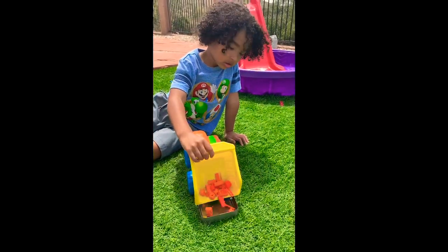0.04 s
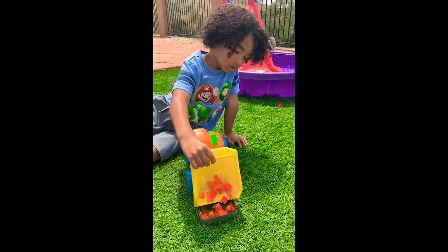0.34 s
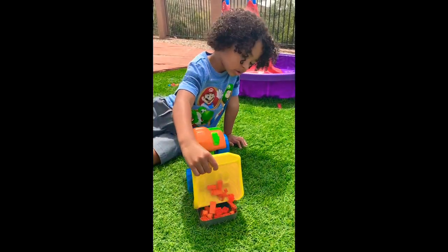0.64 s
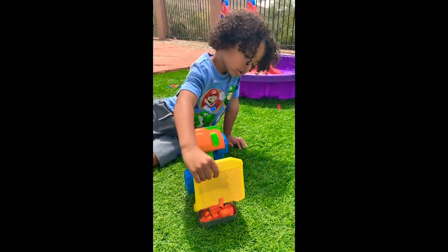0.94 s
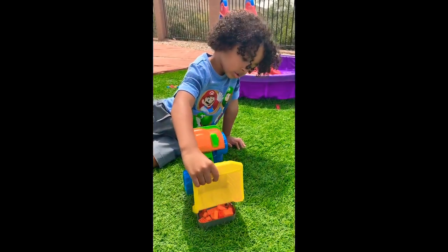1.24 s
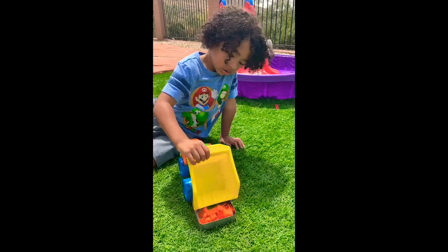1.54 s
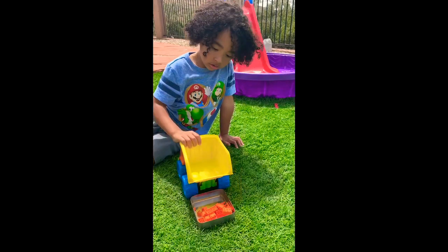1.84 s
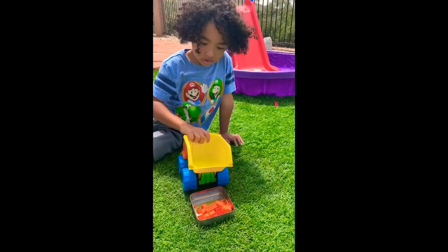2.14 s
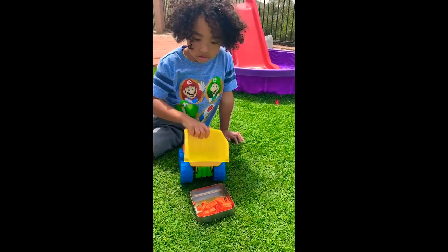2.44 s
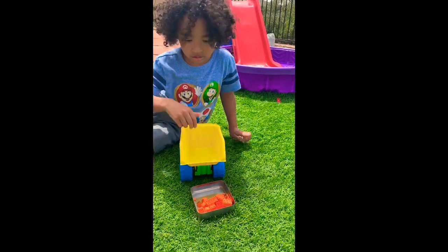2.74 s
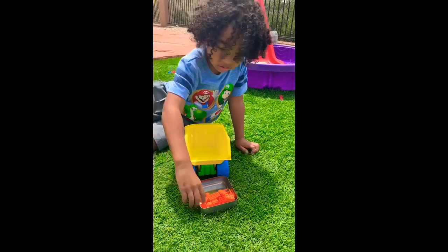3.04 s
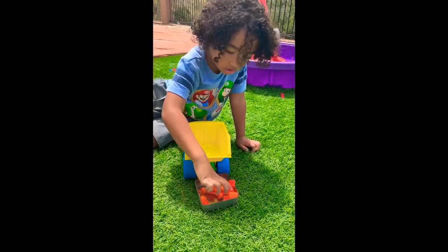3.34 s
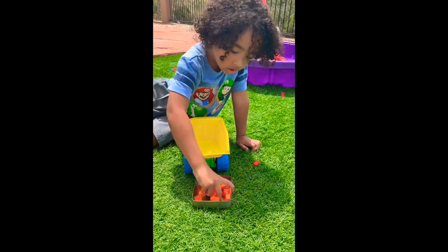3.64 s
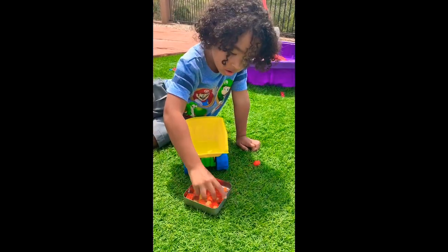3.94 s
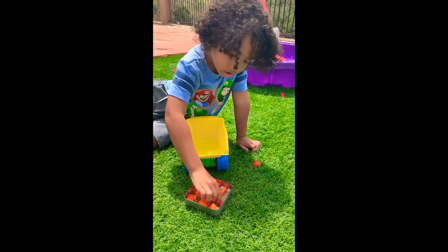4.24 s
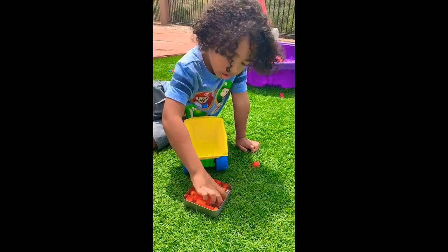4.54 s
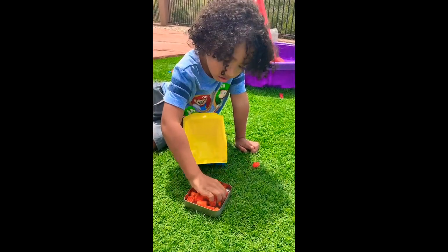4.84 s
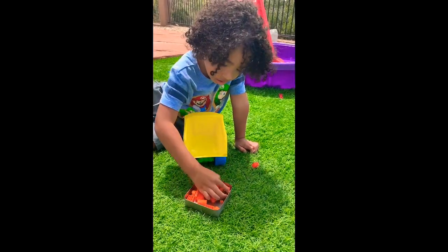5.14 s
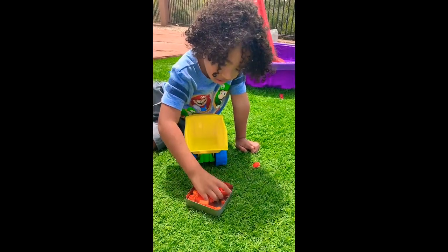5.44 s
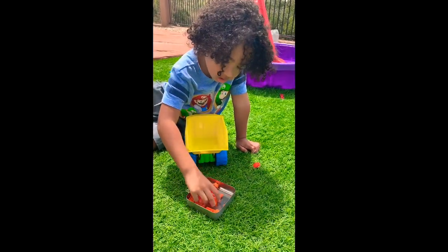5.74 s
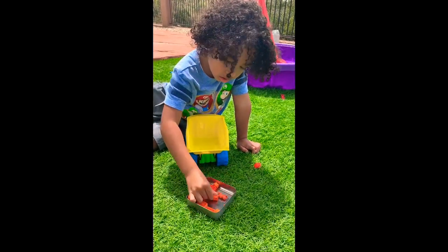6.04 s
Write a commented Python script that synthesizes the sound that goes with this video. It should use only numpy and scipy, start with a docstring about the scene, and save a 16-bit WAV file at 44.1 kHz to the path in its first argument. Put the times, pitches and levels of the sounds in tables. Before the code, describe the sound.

Small hard pieces tumble from a plastic toy dump truck into a shallow metal tin with a bright, clinking rattle. The hollow truck knocks as it is tipped back and moved, with a faint brush of cloth and grass. Then fingers stir the pieces around the tin in uneven bursts. Wind rumbles on the close phone microphone over a quiet garden.

```python
"""Small hard pieces rattle out of a plastic toy dump truck into a shallow metal tin on a lawn.
Each hit is a short crack that sets the tin ringing. The hollow truck knocks as it is tipped back
and moved, cloth and grass rustle, then fingers stir the pieces round the tin. All the while,
wind buffets the two microphone openings (ports) of a phone held close by, over a quiet garden."""
import sys
import numpy as np
from scipy import signal
from scipy.fft import rfft, irfft, next_fast_len
from scipy.io import wavfile
from scipy.ndimage import uniform_filter1d

SR = 44100
rng = np.random.default_rng(int(sys.argv[2]) if len(sys.argv) > 2 else 0)


def put_to_file(sound):
    """Save the sound as 16-bit audio at rate SR, in the file named by the first command-line argument."""
    columns = np.atleast_2d(sound).T  # one column per channel
    safe = np.clip(columns, -1, 1)
    whole_steps = np.round(safe * 32767)
    wavfile.write(sys.argv[1], SR, whole_steps.astype(np.int16))


N = 272337
TIME = np.arange(N) / SR
AGE = np.arange(4096) / SR  # seconds since a hit
SPLITS_HZ = (2750, 5600)  # borders between the tin's bottom notes, its wall notes and the bright tick


def undb(db):
    """Turn decibels into a gain."""
    return 10 ** (np.asarray(db) / 20)


def unit(x):
    """Scale to an average (rms) size of 1."""
    return x / np.sqrt(np.mean(x ** 2))


def wander(per_s):
    """Drift at random, turning per_s times a second."""
    count = int(TIME[-1] * per_s) + 2
    return unit(np.interp(TIME * per_s, np.arange(count), rng.standard_normal(count)))


def colour(x, points):
    """Shape the tone along a curve of (f/Hz, level/dB) points."""
    hz, db = np.transpose(points)
    size = 2 * len(AGE)
    grid = np.maximum(np.fft.rfftfreq(size, 1 / SR), 1)
    gain = undb(np.interp(np.log(grid), np.log(hz), db))
    cepstrum = irfft(np.log(gain))
    cepstrum[1:size // 2] *= 2  # folded so the filter rings after a hit, never before
    cepstrum[size // 2 + 1:] = 0
    response = irfft(np.exp(rfft(cepstrum)))
    length = x.shape[-1]
    return irfft(rfft(x) * rfft(response, length), length)


def stereo_noise(points, side_db):
    """Shaped noise, partly different at the two ports."""
    mid, side = colour(rng.standard_normal((2, N)), points)
    return unit(mid + undb(side_db) * side * np.array([[1], [-1]]))


def even(x, size=2400):
    """Smooth out the chance swells of a noise."""
    return x / np.sqrt(uniform_filter1d(np.mean(x ** 2, axis=0), size) + 1e-9)


def fade(t60):
    """One fade-out for each t60, the seconds it takes to fall by 60 dB."""
    return np.exp(-np.log(1000) * AGE / np.maximum(np.reshape(t60, (-1, 1)), .001))


def ring(hz, t60):
    """One fading pure tone for each frequency."""
    return np.sin(2 * np.pi * np.outer(hz, AGE)) * fade(t60)


def peak_to(waves, db, size=128):
    """Bring each hit's loudest moment to the given level."""
    peak = np.sqrt(uniform_filter1d(waves ** 2, size, axis=-1).max(axis=-1))
    return waves * (undb(db) / peak)[..., None]


def weigh(waves, splits_hz, levels_db):
    """Set each band's level, low to high: these depend on where and how hard a hit lands."""
    out = 0
    for hz, db in zip(splits_hz, levels_db):
        low = signal.sosfilt(signal.butter(5, hz, "low", fs=SR, output="sos"), waves)
        waves = signal.sosfilt(signal.butter(5, hz, "high", fs=SR, output="sos"), waves)
        out = out + peak_to(low, db)
    return out + peak_to(waves, levels_db[-1])


def place(times, waves):
    """Lay the hits out in time."""
    out = np.zeros(N + len(AGE))
    for start, wave in zip(np.clip(times * SR, 0, N - 1).astype(int), waves):
        out[start:start + len(AGE)] += wave
    return out[:N]


def tin_hits(times, t60, ring_db, tail_db, attack_s, filled_s=2):
    """A piece meets the tin: a crack, the piece's own brief ring, and the tin's notes."""
    # the tin's notes: f/Hz, t60/s, relative level/dB for dropped pieces, the same for pushed ones
    tin_notes = [(335, 0.05, -18, -40.5), (506, 0.04, -27.5, -24), (741, 0.049, -12, -26.5),
                 (995, 0.029, -9, -14.5), (1233, 0.024, -10.5, -16.5), (1570, 0.046, -3.5, -8.5),
                 (1676, 0.048, 0, -5), (1790, .04, -51, -15), (2123, 0.066, -13, -12.5),
                 (2294, 0.057, -11.5, -2), (2392, 0.024, -6.5, 8), (3024, 0.17, -15, -16.5),
                 (3472, 0.071, -10, -2.5), (3634, 0.079, -7.5, -4), (4154, 0.15, -16, -7.5),
                 (4202, 0.029, 4.5, 10), (4554, 0.037, 5.5, -8.5), (4805, 0.042, -4, 2.5),
                 (5234, 0.056, 9, 5), (6560, 0.055, -1, -42), (6330, 0.048, -9.5, -5),
                 (6770, 0.07, -7, -2.5), (7550, 0.036, -2.5, -3.5), (7500, 0.03, -19, -16),
                 (8240, 0.067, -9.5, -4), (9270, 0.036, -15.5, -10), (9600, 0.052, -18.5, -10.5),
                 (10100, 0.04, -16.5, -6), (10650, 0.069, -9.5, -7), (14500, 0.035, -13, -5)]
    # tone of the dense, fine ring of pieces and tin: f/Hz, relative level/dB
    clatter_tone = [(100, -34), (300, -15), (500, -22), (750, -17.5), (1200, 1), (1800, 5.5), (2800, 2),
                    (4200, 10.5), (5700, 10), (6700, 6.5), (9000, 4.5), (12000, -5), (14000, 3.5),
                    (16000, -16)]
    count = len(times)
    hz, note_t60, drop_db, push_db = np.transpose(tin_notes)
    shape = undb(np.where(times[:, None] < filled_s, drop_db, push_db))
    # the spot that is hit decides which notes stand out
    strength = shape * rng.standard_normal((count, len(hz)))
    strength *= undb(2.5 * rng.standard_normal(strength.shape))
    tin = np.zeros((count, len(AGE)))
    for group in np.array_split(np.argsort(times), 24):
        detune = 1 + .006 * rng.standard_normal(len(hz))  # by the shifting load
        tin[group] = strength[group] @ ring(hz * detune, note_t60)
    piece = peak_to(ring(rng.uniform(6000, 11500, count), .03), -9)
    crack_fade = fade(t60) + undb(tail_db) * fade(.13)
    crack = colour(rng.standard_normal(tin.shape) * crack_fade, clatter_tone)
    onset = 1 - np.exp(-AGE / attack_s)  # waves take a moment to fill the metal
    return (peak_to(crack, 0) + peak_to(tin, ring_db) + piece) * onset


def heap(span_s, count, tick_db, wall_db, bottom_db, ring_db, spread_db, attack_s):
    """Many small, uneven collisions as the heap slides or is pushed, then settles."""
    # moves of the heap: t/s, length/s, relative level/dB, brightness/dB
    shoves = [(0.0, 0.1, -38, -5), (0.048, .25, -33, -2.5), (0.317, 0.26, -38, -0.5), (0.639, .21, -31, -2),
              (0.852, 0.098, -37.5, 1.5), (0.98, 0.36, -56, -3.5), (1.495, 0.13, -39, -1),
              (3.092, 0.12, -29.5, -0.5), (3.322, .14, -36, 0.5), (3.52, 0.095, -36, 0),
              (3.65, .09, -42.5, 0), (3.73, 0.22, -36, 0), (3.873, 0.29, -32, 1.5),
              (4.146, 0.23, -37.5, -0.5), (4.479, .15, -42, 0), (4.777, 0.067, -55.5, -5.5),
              (4.888, 0.042, -44.5, 3), (4.97, 0.094, -51.5, 2.5), (5.253, 0.21, -51.5, 0.5),
              (5.613, 0.064, -46, -3), (5.779, 0.063, -49.5, -0.5), (5.922, 0.16, -34.5, 0)]
    rise_db_per_s, settle_db_per_s = 2513, 267
    s = span_s[0] + (span_s[1] - span_s[0]) * (np.arange(count) + rng.uniform(0, 1, count)) / count
    size_db = spread_db * np.clip(rng.standard_normal(count), -2, 1.4)
    start, length, db, bright_db = np.transpose(shoves)
    since = s[:, None] - start
    motion = db - rise_db_per_s * np.maximum(-since, 0) - settle_db_per_s * np.maximum(since - length, 0)
    level = motion.max(axis=1) + size_db  # each hit follows the strongest move
    bright = bright_db[motion.argmax(axis=1)]
    levels = (level - bright + bottom_db, level + wall_db, level + bright + tick_db)
    waves = tin_hits(s, np.full(count, .018), ring_db, tail_db=-22, attack_s=attack_s)
    return place(s, weigh(waves, SPLITS_HZ, levels))


def wind(breeze_db=-43, sway_db=3, rumble_db=-1, flutter_db=-54, buffet_db=-3):
    """Slow swirls of air rumble, stronger gusts flutter higher, and a few thump the ports."""
    # gusts: peak t/s, length/s, relative level/dB
    gust_peaks = [(0.293, 0.065, -30.5), (0.394, 0.043, -30.5), (0.8, 0.053, -32), (1.2, 0.1, -35),
                  (1.444, 0.11, -30), (1.623, 0.064, -34.5), (1.777, 0.065, -29.5), (1.897, 0.033, -36.5),
                  (2.396, 0.033, -29.5), (2.663, 0.047, -34.5), (2.96, 0.044, -33.5), (3.161, 0.045, -25.5),
                  (3.328, 0.093, -21.5), (3.414, 0.035, -25), (3.521, 0.059, -29), (3.717, 0.039, -22),
                  (3.798, 0.031, -22.5), (3.874, 0.064, -30), (4.143, .05, -34.5), (4.284, 0.094, -32),
                  (4.625, 0.03, -36.5), (5.005, 0.037, -23.5), (5.126, 0.13, -26.5), (5.39, 0.1, -35),
                  (5.767, 0.11, -35), (6.06, .15, -36)]
    # sudden thumps: t/s, relative level/dB
    buffets = [(1.409, -22.5), (1.446, -25.5), (3.292, -9.5), (3.343, -12.5), (3.354, -14), (3.392, -12.5),
               (4.994, -18), (5.067, -18.5), (5.105, -15)]
    # tones of the three wind sounds: f/Hz, relative level/dB
    rumble_tone = [(12, -17), (25, 0), (48, 3), (80, 1.5), (115, -12), (170, -28), (300, -52.5),
                   (1500, -100)]
    flutter_tone = [(60, -12), (120, 5), (180, -1.5), (250, -9.5), (350, -17), (500, -33.5), (900, -44.5),
                    (3000, -83)]
    thump_tone = [(30, -4.5), (110, 5.5), (220, -2), (400, -17.5), (700, -27.5), (2000, -84), (5000, -84)]
    breeze = undb(breeze_db + sway_db * wander(8))
    gusts = [undb(db) * .5 ** (2 * ((TIME - s) / length) ** 2) for s, length, db in gust_peaks]
    force = np.linalg.norm([breeze] + gusts, axis=0)
    rumble = even(stereo_noise(rumble_tone, side_db=-21.5)) * force * undb(rumble_db)
    flutter_gain = undb(flutter_db) * (force / undb(breeze_db)) ** 1.2053  # grows faster than rumble
    flutter = even(stereo_noise(flutter_tone, side_db=-8.5)) * flutter_gain
    s, db = np.transpose(buffets)
    thumps = colour(rng.standard_normal((len(s), len(AGE))) * AGE * fade(.034), thump_tone)
    return rumble + flutter + place(s - .003, peak_to(thumps, db + buffet_db))


def garden(level_db=-50.5):
    """A faint, steady hush from all around."""
    # tone of the hush: f/Hz, relative level/dB
    hush_tone = [(100, 7.5), (250, 5), (400, -5), (550, 1.5), (800, -0.5), (1100, -0.5), (1700, -3),
                 (2600, -10), (4000, -12), (5500, -22.5), (8000, -24), (11000, -43), (16000, -35)]
    return stereo_noise(hush_tone, side_db=0) * undb(level_db)


def clinks(tick_db=-13, wall_db=-1, bottom_db=-2, attack_s=.0007):
    """Single pieces strike the tin and stand out from the rattle."""
    # strikes: t/s, relative level/dB of the tick, of the walls and of the bottom, crack t60/s
    strikes = [(0.058, -10, -23, -13.5, 0.084), (0.0852, -3.5, -30, -26.5, 0.068),
               (0.118, -31, -19, -17.5, 0.04), (0.1384, -29, -25, -21.5, 0.057),
               (0.182, 0, -18, -13.5, 0.048), (0.2268, -6, -15, -20, 0.04), (0.252, -4, -28, -26, 0.04),
               (0.3264, -14.5, -25, -25.5, 0.07), (0.369, -10, -22.5, -31.5, 0.033),
               (0.417, -15.5, -32, -42, 0.12), (0.5067, -12, -22.5, -35.5, 0.026),
               (0.5312, -14.5, -19, -29.5, 0.078), (0.5568, -7.5, -21.5, -26.5, 0.028),
               (0.618, -29, -42, -23.5, 0.036), (0.6509, -4.5, -23, -25.5, 0.089),
               (0.7213, -17, -38, -52, 0.026), (0.7446, -18, -50, -29.5, 0.054),
               (0.7698, -17, -33, -21.5, 0.04), (0.7989, -7, -19, -34, 0.12),
               (0.8244, -24, -16, -31.5, 0.025), (0.8764, -35, -48, -26.5, 0.083),
               (0.941, -16, -25.5, -47, 0.035), (1.0221, -20, -42, -34.5, 0.12),
               (1.0915, -17.5, -51, -29.5, 0.073), (1.1892, -24, -41, -68, 0.04),
               (1.2232, -22.5, -51, -32, 0.031), (1.2534, -53, -57, -41, 0.064),
               (1.279, -14.5, -32.5, -37, 0.024), (1.3278, -26.5, -27, -36, 0.12),
               (1.448, -34, -32.5, -39, 0.12), (1.5047, -29, -30, -33, 0.021),
               (1.513, -3.5, -18.5, -22, 0.017), (1.5635, -10.5, -28, -32.5, 0.065),
               (1.6082, -23, -30, -38.5, 0.022), (1.718, -19.5, -33.5, -33.5, 0.028),
               (3.1032, -1, -20, -15.5, 0.049), (3.1524, -22, -16.5, -35.5, 0.021),
               (3.2054, -34, -29, -39, 0.04), (3.2942, -15.5, -37, -31.5, 0.051),
               (3.3405, -15.5, -36, -60, 0.12), (3.3676, -10.5, -25, -26.5, 0.086),
               (3.4246, -26, -26.5, -30.5, 0.023), (3.5139, -17, -28, -30, 0.04),
               (3.5523, -15, -24, -34, 0.058), (3.5674, -31, -20, -43, 0.04),
               (3.6312, -15.5, -27, -25, 0.049), (3.6729, -17.5, -28.5, -36, 0.04),
               (3.7524, -3, -27, -30, 0.02), (3.8926, -18, -23.5, -22.5, 0.04),
               (3.919, -15, -20, -20.5, 0.054), (3.9405, -7.5, -19.5, -18.5, 0.027),
               (3.9867, -12.5, -42, -33, 0.04), (4.0694, -6.5, -19.5, -19, 0.018),
               (4.1106, -2, -15.5, -10, 0.014), (4.1375, -14, -21.5, -39, 0.062),
               (4.2166, -11, -30.5, -31, 0.12), (4.3221, -19.5, -37, -23, 0.12),
               (4.357, -15.5, -25, -31, 0.04), (4.4341, -17, -20.5, -34, 0.07),
               (4.4645, -8.5, -22, -20, 0.02), (4.5348, -17.5, -32, -29, 0.04),
               (4.583, -17.5, -25.5, -34.5, 0.093), (4.7, -23.5, -59, -32, 0.04),
               (4.8354, -24, -56, -37, 0.04), (4.8838, -18, -51, -34.5, 0.029),
               (4.9166, -14.5, -33.5, -41, 0.058), (5.1007, -22.5, -30.5, -46, 0.013),
               (5.1705, -15.5, -25.5, -31, 0.04), (5.2864, -19.5, -48, -66, 0.075),
               (5.4308, -50, -28.5, -55, 0.055), (5.5732, -29, -37, -36, 0.04),
               (5.6017, -14.5, -24.5, -28.5, 0.081), (5.66, -7.5, -25, -30.5, 0.048),
               (5.731, -28, -38, -37.5, 0.047), (5.7989, -18.5, -32.5, -31.5, 0.12),
               (5.841, -26, -35, -46, 0.04), (5.9462, -5, -19, -26.5, 0.06),
               (6.0172, -9.5, -48, -31, 0.013), (6.0402, -11.5, -38, -19.5, 0.032),
               (6.063, -11, -25, -25, 0.034), (6.1056, -6, -24, -25.5, 0.087),
               (6.153, -26, -33, -37.5, 0.063)]
    s, tick, wall, bottom, t60 = np.transpose(strikes)
    levels = np.array([bottom + bottom_db, wall + wall_db, tick + tick_db])
    ring_db = 7 - 1.27 * (levels[2] - levels[0])  # a glancing hit, more tick than bottom, rings less
    landing = tin_hits(s, t60, ring_db, tail_db=-11, attack_s=attack_s)
    out = place(s, weigh(landing, SPLITS_HZ, levels))
    # a faint tick comes just before each clink, and a light bounce follows
    for earliest_s, latest_s, db in ((-.005, -.0015, -13), (.004, .012, -15)):
        light = tin_hits(s, t60 / 2, ring_db=2, tail_db=-24, attack_s=attack_s)
        times = s + rng.uniform(earliest_s, latest_s, len(s))
        out += place(times, weigh(light, SPLITS_HZ, levels + db))
    return out


def pings():
    """A loose piece bounces with a thin, bright note."""
    # bounces: t/s, f/Hz, level/dB, t60/s
    bounces = [(0.8627, 8500, -11, 0.015), (0.878, 8400, -24, 0.036), (0.946, 8340, -30.5, 0.084),
               (.989, 8400, -26, 0.019), (1.023, 8340, -36, 0.18)]
    s, hz, db, t60 = np.transpose(bounces)
    return place(s, ring(hz, t60) * undb(db)[:, None])


def truck(body_db=-7, edge_db=-1, attack_s=.00024, bounce_db=-6, shell_db=1, early_db=-10):
    """Loose plastic joints clack, bounce back and set the hollow truck ringing."""
    # knocks: t/s, relative level/dB of the body and of the edge, f/Hz of the struck panel
    knocks = [(1.501, -23, -44, 755), (1.575, -28, -27, 964), (1.596, -25, -33, 720),
              (1.634, -27.5, -29, 1120), (1.657, -18, -21.5, 724), (1.704, -26.5, -37.5, 738),
              (1.737, -26.5, -31.5, 759), (1.772, -28, -35.5, 1100), (1.815, -21, -36, 875),
              (1.875, -29.5, -43, 780), (1.93, -37, -55, 773), (2.046, -21, -32, 810),
              (2.076, -19.5, -42.5, 780), (2.768, -27, -35.5, 1040), (2.786, -18, -35, 856),
              (2.813, -27.5, -57, 719), (2.889, -28.5, -33.5, 1110), (2.957, -28.5, -40, 700),
              (2.98, -19.5, -28.5, 457), (3.0, -18, -28.5, 940), (3.058, -35, -47, 528),
              (4.358, -34, -37.5, 673), (4.887, -24.5, -43, 530), (5.005, -29.5, -41, 604),
              (5.045, -30.5, -40, 1140), (5.105, -26, -38, 720), (5.35, -22.5, -25, 587),
              (5.382, -23, -36.5, 802), (5.437, -32.5, -45, 732)]
    # the hollow shell's notes: f/Hz, t60/s, relative level/dB
    shell_notes = [(318, 0.09, -4.5), (513, 0.061, -8), (542, 0.086, 1), (689, 0.1, -4), (787, 0.069, -4),
                   (880, 0.021, -8), (1090, 0.055, -17), (1166, 0.08, -5), (1493, 0.13, -2.5),
                   (1710, 0.018, 19.5), (1830, 0.059, -49), (1935, 0.025, 15)]
    # tone of a plastic clack: f/Hz, relative level/dB
    plastic_tone = [(100, -30), (300, -2), (550, -2), (900, 7.5), (1400, -6), (1900, -6.5), (2600, -11),
                    (4000, -15.5), (8000, -26.5), (11000, -45), (16000, -44)]
    s, low_db, high_db, panel_hz = np.transpose(knocks)
    hz, note_t60, db = np.transpose(shell_notes)
    octaves_away = np.abs(np.log2(hz / panel_hz[:, None]))
    strength = undb(db - 13 * octaves_away)  # notes near the panel's pitch ring most
    shell = (strength * rng.standard_normal(strength.shape)) @ ring(hz, note_t60)
    decay = fade(t60=.032)[0]
    rebound = np.array([np.pad(decay, (lag, 0))[:len(AGE)] for lag in rng.integers(130, 400, len(s))])
    clack = colour(rng.standard_normal(shell.shape) * (decay + undb(bounce_db) * rebound), plastic_tone)
    waves = (peak_to(clack, 0) + peak_to(shell, shell_db)) * (1 - np.exp(-AGE / attack_s))
    hits = weigh(waves, splits_hz=[1350], levels_db=(low_db + body_db, high_db + edge_db))
    early_s = rng.uniform(.002, .007, len(s))  # a faint clack comes just before each knock
    return place(s, hits) + place(s - early_s, peak_to(clack, high_db + early_db))


def rustle(grain_db=4):
    """Cloth and grass brush in fine, uneven grains as the arm shifts."""
    # loudness of the brushing: t/s, level/dB
    swells = [(1.75, -62.5), (1.9, -80), (2.0, -73), (2.04, -52.5), (2.09, -74), (2.2, -85), (2.55, -74.5),
              (2.68, -67), (2.77, -59), (2.83, -67), (2.97, -63), (3.08, -67)]
    # tone of cloth and grass: f/Hz, relative level/dB
    brush_tone = [(800, -39.5), (2500, -1), (4500, -1.5), (7000, 1.5), (9500, -3), (14000, -12),
                  (16000, -13)]
    s, db = np.transpose(swells)
    grains = rng.standard_normal(N) * undb(grain_db * wander(280))
    return unit(colour(grains, brush_tone)) * np.interp(TIME, s, undb(db), left=0, right=0)


def ports(x):
    """Close sounds reach the left port first, with ever-changing scatter off hand and ground."""
    # how far the left port is ahead: f/Hz, phase/rad
    left_lead = [(0, 0), (1000, .15), (1800, .1), (2350, 1.3), (3100, 1.8), (3700, 1.5), (4400, 1.6),
                 (5400, 3.14), (6400, 5.0), (7100, 5.9), (9400, 6.6), (11100, 8.5), (12500, 9.42),
                 (13500, 9.9), (14600, 11.6), (16500, 12.6)]
    # tone of the scattered sound: f/Hz, level/dB
    scatter_tone = [(300, -16), (1000, -23), (1700, -19), (2400, -8), (4400, -11), (5400, -20), (7000, -12),
                    (10000, -13), (12500, -26), (15000, -17)]
    hz, lead = np.transpose(left_lead)
    turn = np.exp(.5j * np.interp(np.fft.rfftfreq(N, 1 / SR), hz, lead))
    paths = signal.hilbert(colour(x, scatter_tone), next_fast_len(N))[:N]
    scatter = rfft(paths.real * wander(35) + paths.imag * wander(35)) / np.sqrt(2)
    direct = rfft(x)
    return irfft(np.array([(direct + scatter) * turn, (direct - scatter) * turn.conj()]), N)


def scene(pan_db=-0.5):
    """Mix the close sounds of tin, truck and rustle with the wind and the garden."""
    pouring = heap(span_s=(0, 1.75), count=280, tick_db=1, wall_db=1.5, bottom_db=-1,
                   ring_db=-0.5, spread_db=3.5, attack_s=.00049)
    stirring = heap(span_s=(3.09, 6.17), count=540, tick_db=-0.5, wall_db=-0.5, bottom_db=-4.5,
                    ring_db=-4, spread_db=5, attack_s=.0019)
    near = ports(pouring + stirring + clinks() + pings() + truck() + rustle())
    return near * undb([[pan_db / 2], [-pan_db / 2]]) + garden() + wind()


def record(dry, top_hz=16000):
    """The phone clips peaks at full scale and cuts the highest treble."""
    lowpass = signal.ellip(10, .2, 70, top_hz, fs=SR, output="sos")
    return signal.sosfilt(lowpass, np.clip(dry, -1, 1))


dry = scene()
out = record(dry)
put_to_file(out)
```